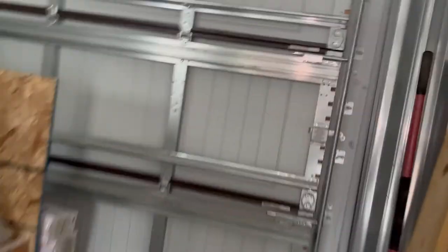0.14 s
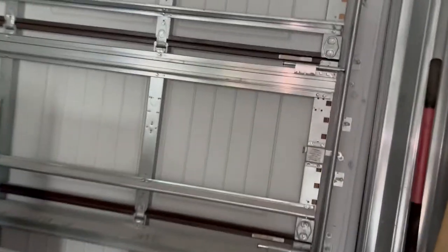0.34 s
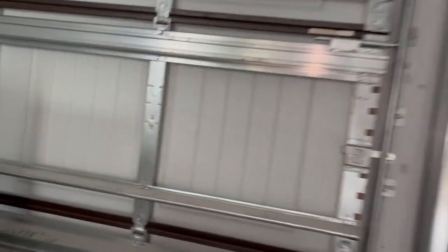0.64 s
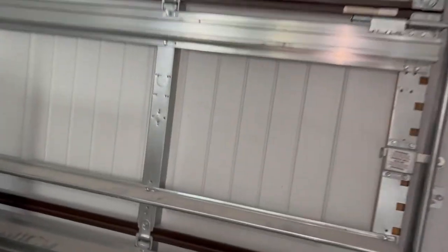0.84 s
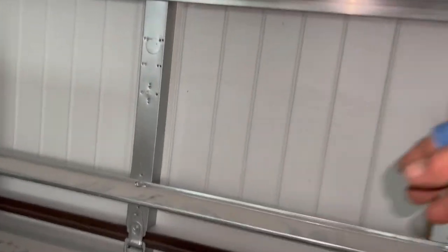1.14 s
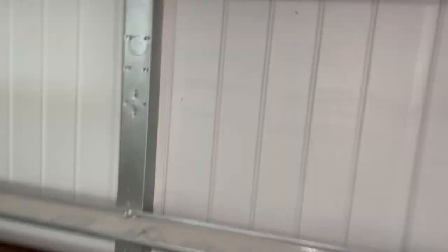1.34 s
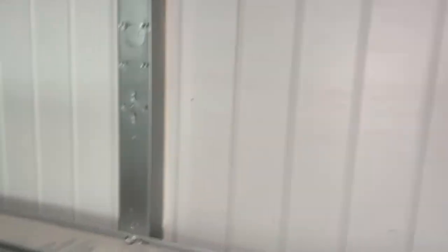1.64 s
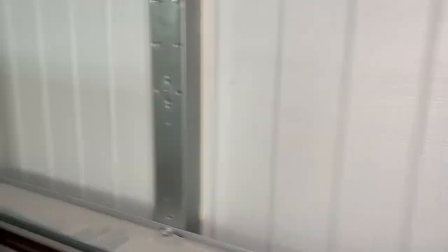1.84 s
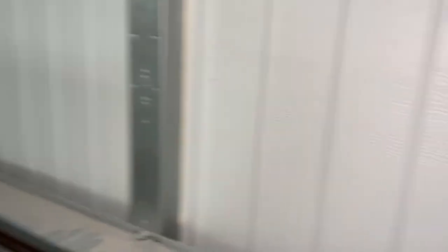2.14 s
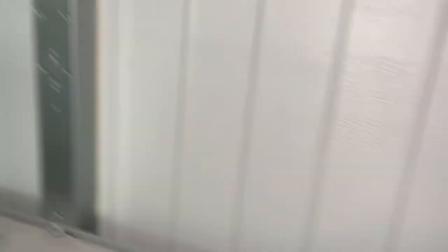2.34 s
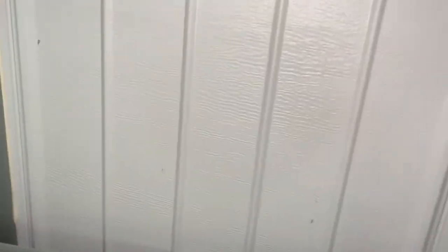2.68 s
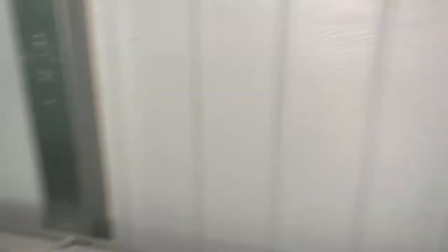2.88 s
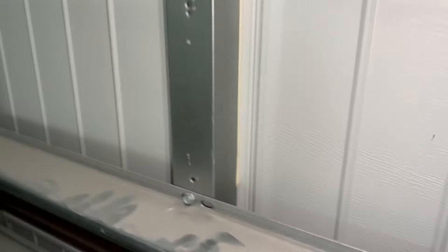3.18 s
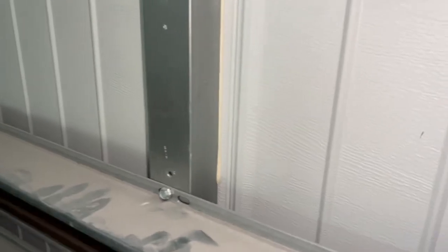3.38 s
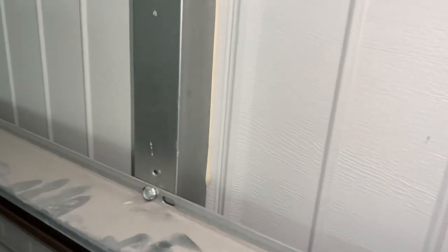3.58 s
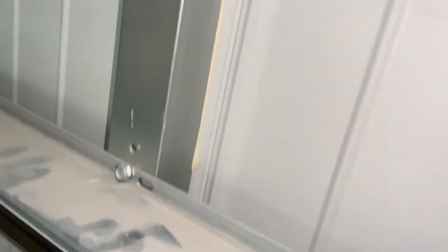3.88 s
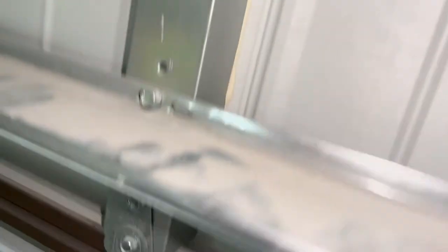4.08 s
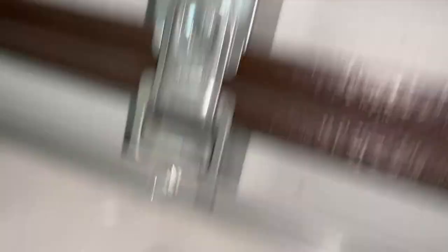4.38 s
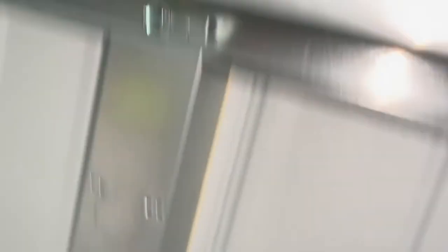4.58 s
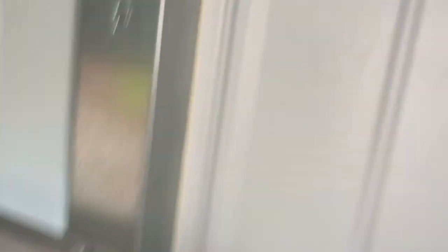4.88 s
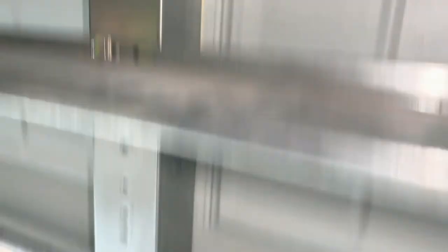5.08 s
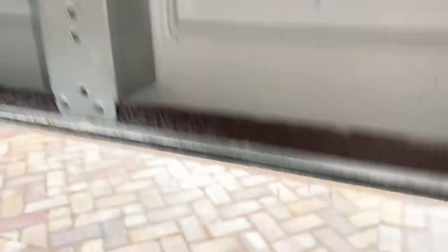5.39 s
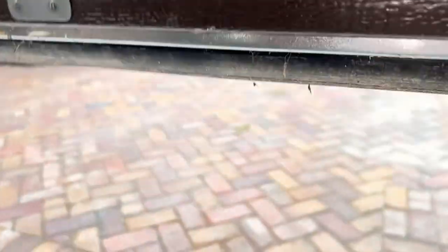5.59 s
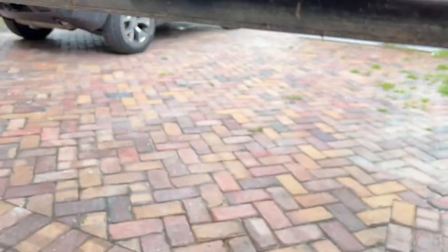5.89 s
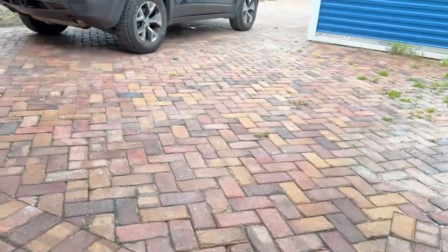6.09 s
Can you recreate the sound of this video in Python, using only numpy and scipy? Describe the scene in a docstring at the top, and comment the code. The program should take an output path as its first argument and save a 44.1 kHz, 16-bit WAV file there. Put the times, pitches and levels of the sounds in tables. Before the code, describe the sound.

Close up in a garage: small bright key jingles, faint scuffing soles and light touches on a handle. A slide bolt catches with hollow knocks, then shoots back in a loud squeaky clack that leaves the panels quivering. After a short lull the sectional steel door rolls up, booming and rattling with clanking hinges, swells, nearly stops, and rolls on.

```python
"""A garage: someone with jingling keys steps up to a sectional steel door and shoots back its slide bolt.
The panels shudder, then the door is heaved up: its speed drives boom, rumble and rattle, made of random
impacts shaped by filters and resonances. Hinges clank, rollers grind and squeak, panels knock as damped tones.
It almost stops, then rolls on. A phone with two microphone ports is held close to the panels."""
import sys
import numpy as np
from scipy import signal
from scipy.fft import rfft, irfft, next_fast_len
from scipy.io import wavfile
from scipy.ndimage import uniform_filter1d, map_coordinates

SR = 44100
rng = np.random.default_rng(int(sys.argv[2]) if len(sys.argv) > 2 else 0)


def dump_mix(stems):
    """Bounce the given channels to the path in sys.argv[1] as a 16-bit WAV at rate SR."""
    frames = np.atleast_2d(stems).T  # one column per channel
    limited = np.clip(frames, -1, 1)  # hard clip at full scale
    pcm = np.round(limited * 32767).astype(np.int16)
    wavfile.write(sys.argv[1], SR, pcm)


N = 274743


def amp(db):
    """Amplitude factor of a level in dB."""
    return 10 ** (np.asarray(db) / 20)


def unit(x):
    """x scaled to rms 1."""
    return x / np.sqrt(np.mean(x ** 2) + 1e-20)


def along(points, hz):
    """Frequency-value points read on a log frequency axis."""
    f, v = np.transpose(points)
    return np.interp(np.log(hz + 1), np.log(f + 1), v)


def wobble(rate_hz):
    """Smooth random curve with rate_hz knots a second."""
    knots = rng.standard_normal(int(N * rate_hz / SR) + 4)
    return map_coordinates(knots, [np.arange(N) * rate_hz / SR])


def add(track, start_s, x):
    """Mix x into the track from start_s."""
    start = max(round(start_s * SR), 0)
    track[start:start + len(x)] += x[:N - start]


def coloured(x, spectrum):
    """Causal minimum-phase filter with the given spectrum; white noise keeps its power."""
    size = 16384
    gain = unit(amp(along(spectrum, np.fft.rfftfreq(size, 1 / SR))))
    cepstrum = irfft(np.log(gain + 1e-6))
    cepstrum[1:size // 2] *= 2
    cepstrum[size // 2 + 1:] = 0
    response = irfft(np.exp(rfft(cepstrum)))[None, :size // 2]
    return signal.fftconvolve(x, response, axes=1)[:, :N]


def contacts(size, rate_hz, spread_db):
    """Random tiny impacts of uneven strength, rms 1."""
    chance, strength = rng.random(size), rng.standard_normal(size)
    sign = rng.choice([-1, 1], size)
    hit = chance < rate_hz / SR
    hit[0] = True
    return unit(hit * sign * amp(spread_db * strength))


def burst(length_s, rate_hz, fade_db):
    """Short run of impacts that weakens by fade_db over its length, or grows if that is negative."""
    size = max(int(length_s * SR), 16)
    return unit(contacts(size, rate_hz, spread_db=2.5) * amp(-fade_db * np.arange(size) / size))


def swell(start_s, hold_s, fade_db_per_s):
    """Envelope that rises over 45 ms from start_s, holds, then dies away."""
    age_s = np.arange(N) / SR - start_s
    return np.clip(age_s / 0.045, 0, 1) * amp(-fade_db_per_s * np.maximum(age_s - hold_s, 0))


def ringing(modes, scatter_db):
    """Damped modes at new strengths and phases, energy 1."""
    t = np.arange(SR // 4) / SR
    ring = np.zeros(len(t))
    for hz, db, t60_s in modes:
        decay = amp(db + scatter_db * rng.normal() - 60 * t / t60_s)
        ring += decay * np.sin(2 * np.pi * (hz * t + rng.random()))
    return ring / np.linalg.norm(ring)


def resonance(x, hz, width_hz):
    """What passes through one resonance; gain 1 at its centre."""
    return signal.lfilter(*signal.iirpeak(hz, hz / width_hz, fs=SR), x)


def body(x, modes):
    """x with the resonances of a body standing out of it."""
    return x + sum((amp(db) - 1) * resonance(x, hz, width_hz) for hz, width_hz, db in modes)


def even(x, span_s):
    """x with its chance swells levelled out; rms 1."""
    span = int(span_s * SR)
    power = uniform_filter1d(uniform_filter1d(x ** 2, span), span)
    return unit(x / np.sqrt(np.abs(power) + 0.17 * np.mean(x ** 2)))


# Decay of the room tail. Each row: frequency in Hz, t60 in seconds.
ROOM_DECAY = [(80, 0.64), (500, 0.32), (2000, 0.57), (5000, 0.47), (12000, 0.34)]


def garage(x, direct_db, wet_db):
    """Two paths to the phone: same direct sound, unrelated near reflections off the door and room tails."""
    hz, t, z = signal.stft(rng.standard_normal((2, SR * 3 // 4)), SR, nperseg=256)
    decay = amp(-60 * t / along(ROOM_DECAY, hz)[:, None])
    tail = signal.istft(z * decay, SR, nperseg=256)[1]
    age_s = np.arange(tail.shape[1]) / SR
    near = rng.standard_normal(tail.shape) * amp(-60 * age_s / 0.15)
    direct = unit(1. * (age_s == 0))
    paths = amp(direct_db) * direct + unit(near) + amp(wet_db) * unit(tail)
    paths /= np.linalg.norm(paths, axis=1, keepdims=True)
    return signal.fftconvolve(x[None], paths, axes=1)[:, :N]


# Ringing of track and hinges. Each row: frequency in Hz, relative level in dB, t60 in seconds.
STEEL_MODES = [(1378, 4, 0.14), (1955, 6, 0.22), (2170, -9, 0.11), (2360, -9, 0.13), (2640, -2, 0.08),
               (3190, -7, 0.11), (3900, 2, 0.044), (5200, 1, 0.047), (5730, 1, 0.013), (6500, -1, 0.04),
               (6760, 4.5, 0.029), (11100, 23.5, 0.0094)]


def steel(force, ring_db, detune=0.0):
    """Impacts crack and leave steel ringing; detune scatters the pitches as if another spot were struck."""
    modes = [(hz * np.exp(detune * rng.normal()), db, t60_s) for hz, db, t60_s in STEEL_MODES]
    ring = signal.fftconvolve(force, ringing(modes, scatter_db=5))[:len(force)]
    return (force + amp(ring_db) * ring) / np.hypot(1, amp(ring_db))


def clinks(rate_hz, centre_hz, spread, t60_s):
    """Loose rollers and brackets knock as damped sines, each at its own pitch; rms 1."""
    count = int(rate_hz * N / SR)
    when, t = rng.random(count), np.arange(SR // 10) / SR
    pitch, strength = rng.standard_normal((count, 2)).T[:, :, None]
    hz = centre_hz * np.exp(spread * 2 * np.tanh(pitch / 2))
    decay = amp(4.7 * np.clip(strength, -2, 2) - 60 * t / t60_s)
    grains = decay * np.sin(2 * np.pi * hz * t)
    where = (when * N).astype(int)[:, None] + np.arange(len(t))
    return unit(np.bincount(where.ravel(), grains.ravel(), N)[:N])


# Background colour. Each row: frequency in Hz, relative level in dB.
AIR_COLOUR = [(10, -23), (25, -9), (45, -1.5), (72, 7), (95, 1.5), (125, -1), (250, -12.5), (600, -18),
              (1500, -24.5), (4000, -29), (9000, -34), (15000, -28.5)]


def air():
    """Low background of the garage: coloured noise whose level wavers slightly."""
    return amp(-54.0 + wobble(7.55)) * coloured(rng.standard_normal((2, N)), AIR_COLOUR)


# Key touches. Each row: start in seconds, relative level in dB, favoured frequency in Hz.
KEY_TOUCHES = [(0.2825, -46, 15800), (.404, -36, 11100), (.557, -42, 15500), (.62, -37, 13300),
               (.733, -28.5, 14950), (.764, -34.5, 15700), (0.8539, -37, 11060), (1.03, -42.5, 14700),
               (1.1384, -44, 15100), (1.293, -44.5, 6530), (1.66, -45, 13300), (1.7736, -29, 14830),
               (5.674, -47.5, 15700)]
SWAY_FROM_S, SWAY_TO_S, SWAY_DB, SWAY_HZ = 0.12, 1.3, -54, 13300


def touches(count):
    """The clear touches of the keys and count faint ones at random while walking."""
    faint = [(rng.uniform(SWAY_FROM_S, SWAY_TO_S), SWAY_DB, SWAY_HZ) for k in range(count)]
    return list(KEY_TOUCHES) + faint


# Ringing of the keys. Each row: frequency in Hz, relative level in dB, t60 in seconds.
KEY_MODES = [(6530, -15.5, 0.13), (6560, -6, 0.098), (7590, -16, 0.14), (9850, -0.5, 0.16),
             (10500, -16, .25), (11370, -11, 0.29), (11290, 2, 0.058), (13300, -6.5, 0.37),
             (14360, 4, 0.23), (14780, 8, 0.096), (15700, -3, 0.29)]
# Colour of the contact ticks. Each row: frequency in Hz, relative level in dB.
TICK_COLOUR = [(1000, -8), (5000, 0), (6600, -13), (8000, -7), (11300, 6), (12300, 11), (13300, 13),
               (15300, 9.5)]
CHATTER_S, CHATTER_RATE_HZ, CHATTER_FADE_DB = 0.057, 270, 37  # keys swing back and touch again
KEY_SPREAD = 0.0058  # relative pitch scatter between similar keys


def keys():
    """Keys chatter against each other; every touch rings three of them, each a little differently."""
    rings, ticks = np.zeros(N), np.zeros(N)
    for start_s, db, bright_hz in touches(count=7):
        for key in range(3):
            modes = []
            for hz, level_db, t60_s in KEY_MODES:
                lift_db = 6 * np.exp(-((hz - bright_hz) / 500) ** 2)
                modes.append((hz * (1 + KEY_SPREAD * rng.normal()), level_db + lift_db, t60_s))
            touch = burst(CHATTER_S, CHATTER_RATE_HZ, CHATTER_FADE_DB)
            touch /= np.linalg.norm(touch)
            add(rings, start_s, amp(db + 23.0) * signal.fftconvolve(touch, ringing(modes, scatter_db=1.0)))
        add(ticks, start_s, amp(db - 16.5) * burst(0.03, rate_hz=3800, fade_db=20))
    contact = coloured(garage(ticks, direct_db=-20, wet_db=-21.5), TICK_COLOUR)
    return garage(rings, direct_db=30.5, wet_db=8) + contact


# Low thumps and hums of feet, bolt and door. Each row: start in seconds, level in dB, pitch in Hz,
# t60 in seconds.
LOW_THUMPS = [(0, -45.5, 116, 0.75), (0.107, -31, 58.13, 0.13), (.142, -24.5, 63.4, 0.078),
              (.164, -23.5, 54.5, 0.25), (.34, -40.5, 55, 0.45), (1.478, -37.5, 60, 0.49),
              (1.758, -40.5, 72, 3), (2.985, -26, 68.5, .7), (3.165, -21.5, 71.4, 0.43)]
# Soles. Each row: start in seconds, length in seconds, level in dB.
SOLE_SCUFFS = [(0.407, 0.085, -59), (0.513, 0.049, -50), (1.04, 0.17, -60), (1.204, 0.018, -48),
               (1.774, 0.037, -53.5), (1.859, 0.018, -44)]


def thumps_and_scuffs():
    """Low thumps and hums are damped sines; soles scuff the concrete as coloured grit."""
    thumps, scuffs, t = np.zeros(N), np.zeros(N), np.arange(SR) / SR
    attack = 1 - np.exp(-t / 0.0013)
    for start_s, db, hz, t60_s in LOW_THUMPS:
        add(thumps, start_s, amp(db - 60 * t / t60_s) * np.sin(2 * np.pi * hz * t) * attack)
    for start_s, length_s, db in SOLE_SCUFFS:
        add(scuffs, start_s, amp(db) * burst(length_s, rate_hz=6000, fade_db=-3.0))
    sole = [(100, -6.0), (350, 6.5), (1000, -1.5), (2500, -10.5), (7000, -15), (15000, -22)]
    return thumps + coloured(garage(scuffs, direct_db=-11.0, wet_db=-1.5), sole)


# Hand on the handle. Each row: start in seconds, relative knock in dB, rub in dB, rub length in seconds.
HAND_TOUCHES = [(0.429, -55, -60, 0.099), (0.521, -52, -59, .06), (1.015, -45, -59, .1),
                (1.117, -46, -52.5, .08)]
# Handle colour. Each row: frequency in Hz, relative level in dB.
HANDLE_COLOUR = [(120, -16), (210, -8), (300, 11), (430, 8.5), (550, -2), (700, -1.5), (1100, 0),
                 (1350, -15), (2700, -18), (9000, -40)]


def handle():
    """A hand finding the bolt's handle knocks lightly against it and drags over the panel."""
    force = np.zeros(N)
    for start_s, knock_db, rub_db, length_s in HAND_TOUCHES:
        add(force, start_s, amp(knock_db + 1.5) * burst(0.011, rate_hz=2500, fade_db=17))
        add(force, start_s, amp(rub_db) * burst(length_s, rate_hz=1500, fade_db=8))
    return coloured(garage(force, direct_db=4.5, wet_db=-0.5), HANDLE_COLOUR)


# Bolt slides. Each row: start in seconds, length in seconds, guide scrape in dB, panel in dB, slot rub in dB.
BOLT_STROKES = [(1.448, 0.015, -41, -34.5, -50), (1.462, 0.087, -36.5, -36.5, -42),
                (1.973, 0.019, -39, -29, -41), (1.991, 0.19, -52.5, -35.5, -56),
                (2.045, 0.047, -34.5, -56, -61), (2.219, .03, -23, -25, -27), (2.251, 0.02, -13, -43, -21),
                (2.274, 0.00347, -11.5, -11.5, -23)]
# Colours of guide scrape, flange or slot rub, struck panel. Each row: frequency in Hz, relative level in dB.
SCRAPE_COLOUR = [(80, -12), (250, -21), (500, 10.5), (900, 5.5), (1600, -2), (2500, -2), (4000, -5),
                 (5600, -4.5), (7500, -3.5), (9800, -11.5), (11100, -13.5), (13000, -14), (15500, -26)]
FLANGE_COLOUR = [(500, -31.5), (950, 11.5), (1330, 11.5), (1700, 0.5), (2200, 0.5), (2450, -1), (2620, 0),
                 (3000, -10), (4200, -10), (9000, -44)]
PANEL_COLOUR = [(15, -56), (50, -30), (150, -5.5), (300, 1.5), (520, 5), (750, 3.5), (1200, -6.5),
                (1600, -13), (2200, -18.5), (4000, -21), (12000, -65)]
FREED_S = 2.289  # bolt is out


def bolt():
    """The bolt grinds through its guide and the track's slot, shakes its panel and chatters against its stop."""
    scrape, shake, rub = np.zeros((3, N))
    for start_s, length_s, scrape_db, panel_db, slot_db in BOLT_STROKES:
        add(scrape, start_s, amp(scrape_db) * burst(length_s, rate_hz=2000, fade_db=3.0))
        add(shake, start_s, amp(panel_db) * burst(length_s, rate_hz=1500, fade_db=2))
        add(rub, start_s, amp(slot_db) * burst(length_s, rate_hz=500, fade_db=-5.0))
    add(scrape, FREED_S, amp(-34.5) * burst(0.075, rate_hz=3100, fade_db=17))
    add(shake, FREED_S, amp(-20.0) * burst(0.1, rate_hz=1900, fade_db=19))
    grind = coloured(garage(steel(scrape, ring_db=-9.5), direct_db=8, wet_db=1.5), SCRAPE_COLOUR)
    slot = coloured(garage(rub, direct_db=12, wet_db=-9), FLANGE_COLOUR)
    return grind + slot + coloured(garage(shake, direct_db=-2.5, wet_db=-1.0), PANEL_COLOUR)


# Modes of a struck panel. Each row: multiple of its pitch, relative level in dB, t60 in seconds.
KNOCK_MODES = [(.68, -12.5, 0.092), (1, 0, .075), (1.21, -10, 0.041), (1.63, -20, 0.044),
               (2.4, -23.5, 0.032)]
KNOCK_ATTACK_S = 0.0014


def panel_knock(pitch_hz):
    """One blow rings a patch of sheet steel around the given pitch."""
    t = np.arange(SR // 5) / SR
    ring = np.zeros(len(t))
    for ratio, db, t60_s in KNOCK_MODES:
        decay = amp(db + 2 * rng.normal() - 60 * t / t60_s)
        hz = pitch_hz * ratio * (1 + 0.023 * rng.normal())
        ring += decay * np.sin(2 * np.pi * hz * t)
    return ring * (1 - np.exp(-t / KNOCK_ATTACK_S))


# Bolt knocking in its guide. Each row: start in seconds, panel tone in dB, pitch in Hz, relative clatter in dB.
BOLT_CATCHES = [(1.448, -27, 551, -49), (1.465, -25.5, 726, -31.5), (1.479, -26.5, 504, -47),
                (1.492, -24.5, 461, -35), (1.510, -21.5, 817, -33), (1.521, -27, 422.5, -36),
                (1.530, -24.5, 620, -32), (1.539, -29.5, 401, -37), (1.98, -19.5, 788, -46),
                (2.011, -22.5, 713, -42), (2.024, -23, 880, -47.5), (2.049, -37, 617, -46),
                (2.063, -38, 760, -46), (2.078, -32, 504, -47), (2.091, -36, 700, -44),
                (2.103, -26, 610, -40), (2.224, -16, 590, -27), (2.252, -19, 1024, -24),
                (2.264, -7.5, 755, -23.5), (2.292, -6.5, 583, -33), (2.311, -11, 536, -34),
                (2.331, -16, 450, -30)]
# Clatter colour. Each row: frequency in Hz, relative level in dB.
CLATTER_COLOUR = [(400, -37), (1100, -5), (1600, 12.5), (2200, 9), (3000, 3), (4200, 1.5), (7000, -16),
                  (15000, -33)]
# Ringing of bolt and guide. Each row: frequency in Hz, relative level in dB, t60 in seconds.
LATCH_MODES = [(1314, -1, .07), (1425, 2.5, .06), (1783, -1.5, .075), (2035, -1.5, .065), (2230, 4, .055),
               (2628, -2.5, .05), (2860, -0.5, .08), (3133, -5.5, .09), (3610, -5.5, .07),
               (3940, -8.5, .05)]


def catches():
    """The bolt moves in jerks: each catch knocks the panel and sets the bolt ringing in its guide."""
    knock, clatter, ring = np.zeros((3, N))
    for start_s, knock_db, hz, clatter_db in BOLT_CATCHES:
        add(knock, start_s, amp(knock_db) * panel_knock(hz))
        hits = amp(clatter_db) * burst(0.012, rate_hz=400, fade_db=5)
        add(clatter, start_s, hits)
        add(ring, start_s, signal.fftconvolve(hits, ringing(LATCH_MODES, scatter_db=3)))
    metal = amp(-3) * coloured(garage(clatter, direct_db=1, wet_db=-6.0), CLATTER_COLOUR)
    metal += amp(-0.5) * garage(ring, direct_db=11, wet_db=-5.5)
    return metal + garage(knock, direct_db=8, wet_db=-3.5)


# Sheet colour. Each row: frequency in Hz, relative level in dB.
SHEET_COLOUR = [(15, -28), (30, -29), (60, -7), (95, -12), (170, -3.5), (300, -5.5), (520, -2.5),
                (780, -7.5), (950, -15), (1250, -22), (2200, -26.5), (4000, -38), (7000, -44), (14000, -63)]
# Hollow resonances of the closed door's panels. Each row: frequency in Hz, width in Hz, lift in dB.
HOLLOW_MODES = [(432, 28, 7), (478, 30, 3), (530, 45, 4.5), (595, 30, 3), (665, 30, 2.5), (745, 28, 4.5),
                (835, 45, 6), (1150, 22, 8)]
SHUDDER_DB, SHUDDER_HOLD_S, SHUDDER_FADE_DB_PER_S = -26, 0.39, 27


def shudder():
    """The freed sheet panels keep quivering with a hollow ring, then settle."""
    quiver = garage(contacts(N, rate_hz=900, spread_db=0.5), direct_db=4.0, wet_db=1.5)
    ring = even(body(coloured(quiver, SHEET_COLOUR), HOLLOW_MODES), span_s=0.04)
    return amp(SHUDDER_DB) * swell(FREED_S, SHUDDER_HOLD_S, SHUDDER_FADE_DB_PER_S) * ring


BRUSH_S, BRUSH_LENGTH_S, BRUSH_DB = 5.31, 0.18, -48.5


def brush():
    """The rubber seal brushes the frame with a short bright hiss as the door slows."""
    rub = np.zeros(N)
    add(rub, BRUSH_S, amp(BRUSH_DB) * burst(BRUSH_LENGTH_S, rate_hz=10000, fade_db=16))
    rubber = [(1500, -18), (4500, 5.5), (5800, -8), (8000, 4), (13000, -4), (15500, -1.0)]
    return coloured(garage(rub, direct_db=-1, wet_db=15), rubber)


# Dry steel. Each row: start in seconds, hold in seconds, pitch in Hz, nominal width in Hz, level in dB,
# fade in dB per second.
STEEL_SQUEAKS = [(2.239, 0.02, 2585, 110, -17.5, 600), (2.255, 0.016, 5590, 450, -19.5, 900),
                 (2.256, 0.014, 10800, 603, -24.5, 900), (3.081, 0.0085, 2785, 200, -32.5, 380),
                 (3.136, .02, 2775, 110, -46.5, 220), (3.3, 0.018, 1250, 423, -25.5, 450),
                 (3.288, .08, 2570, 600, -40.5, 300), (4.466, 0.021, 2850, 500, -31, 400),
                 (4.544, 0.023, 2160, 380, -28.5, 400), (4.584, 0.018, 2350, 300, -35, 401),
                 (4.64, 0.12, 3220, 550, -36, 200), (4.805, 0.04, 2870, 600, -30.5, 400),
                 (4.838, 0.0096, 2650, 140, -30.5, 175), (4.902, 0.39, 2550, 200, -57.5, 60),
                 (5.297, 0.05, 7100, 800, -44, 198), (5.44, 0.037, 3040, 100, -54, 250),
                 (5.873, 0.01, 2260, 1200, -32, 500), (6.21, .02, 2340, 700, -38, 300)]
SQUEAK_ATTACK_S, SLIP_RATE_HZ, RESONANCE_PASSES = 0.0052, 3800, 3


def squeaks():
    """Dry steel sticks and slips unevenly into one resonance: a narrow one squeals, a wide one scrapes."""
    out, t = np.zeros(N), np.arange(SR * 3 // 4) / SR
    attack = np.clip(t / SQUEAK_ATTACK_S, 0, 1)
    for start_s, hold_s, hz, width_hz, db, fade_db_per_s in STEEL_SQUEAKS:
        ring = contacts(len(t), SLIP_RATE_HZ, spread_db=0.5)
        for k in range(RESONANCE_PASSES):
            ring = resonance(ring, hz, 1.5 * width_hz)  # repeated passes narrow it
        decay = amp(db - fade_db_per_s * np.maximum(t - hold_s, 0))
        add(out, start_s, attack * decay * even(ring, span_s=0.008))
    return garage(out, direct_db=8, wet_db=-5)


# Flanges in the bend. Each row: start in seconds, hold in seconds, level in dB, fade in dB per second.
FLANGE_GRINDS = [(3.266, 0.18, -33, 130), (4.44, 0.37, -27.5, 62), (5.847, 0.0106, -30.5, 110),
                 (6.125, 0.16, -30, 58)]


def flanges():
    """In the bend of the track the roller flanges grind on the rail: impacts coloured strongest near 1 kHz."""
    pressure = sum(amp(db) * swell(start_s, hold_s, fade) for start_s, hold_s, db, fade in FLANGE_GRINDS)
    grit = pressure * contacts(N, rate_hz=1400, spread_db=4.0)
    return coloured(garage(grit, direct_db=3.5, wet_db=-2), FLANGE_COLOUR)


# Hinges in the track. Each row: start in seconds, clank in dB, panel in dB, chatter length in seconds.
HINGE_CLANKS = [(2.983, -35, -31.5, 0.022), (3.164, -37.5, -40, 0.0066), (3.306, -35.5, -19.5, 0.012),
                (3.352, -30.5, -22, 0.053), (3.582, -36, -47, 0.032), (3.837, -40, -28.5, 0.024),
                (3.91, -38, -22, 0.0098), (4.119, -28.5, -17, 0.017), (4.444, -20, -13, 0.022),
                (4.542, -36.5, -17, 0.031), (4.637, -27.5, -21, 0.026), (4.737, -32.5, -20, 0.014),
                (4.77, -23, -39, 0.017), (4.801, -29, -23, 0.013), (5.234, -68, -28, .01),
                (5.719, -41, -36, 0.0083), (5.772, -38.5, -30, 0.011), (5.82, -39, -33, 0.0076),
                (5.875, -52, -23, 0.019), (6.05, -44, -27, 0.055), (6.103, -40, -25, 0.015),
                (6.199, -43, -24, 0.019)]
# Clank colour. Each row: frequency in Hz, relative level in dB.
CLANK_COLOUR = [(200, -31), (900, 8), (1400, 0), (2700, -0.5), (4000, -1), (5500, -3.5), (8000, -4),
                (9500, -13.5), (11000, -12), (15500, -16)]


def hinges():
    """Sections tip into the curve of the track with a chattering clank and a panel thud."""
    clank, thud = np.zeros(N), np.zeros(N)
    for start_s, clank_db, panel_db, length_s in HINGE_CLANKS:
        chatter = np.pad(burst(length_s, rate_hz=2700, fade_db=7.0), (0, SR // 4))  # room to ring out
        add(clank, start_s, amp(clank_db) * steel(chatter, ring_db=-7, detune=0.07))
        add(thud, start_s, amp(panel_db) * burst(length_s, rate_hz=1500, fade_db=7))
    metal = coloured(garage(clank, direct_db=0.5, wet_db=1.0), CLANK_COLOUR)
    return metal + coloured(garage(thud, direct_db=-11.0, wet_db=1.0), PANEL_COLOUR)


# Rollers dropping over bumps. Each row: start in seconds, level in dB, pitch in Hz.
ROLLER_BUMPS = [(2.972, -16.5, 497), (3.206, -22, 777), (3.303, -18, 1312), (3.316, -12.5, 1010),
                (3.388, -14.5, 754), (3.42, -16, 283), (3.563, -14.5, 567), (3.759, -13.5, 584),
                (3.846, -13, 503), (3.918, -12.5, 652), (3.995, -17, 222), (4.069, -9.5, 606),
                (4.152, -10, 663), (4.279, -18, 416), (4.305, -12.5, 670), (4.352, -10.5, 632),
                (4.452, -13, 1150), (4.492, -17.5, 1213), (4.532, -9, 638), (4.636, -10.5, 733),
                (4.803, -11, 630), (5.234, -25, 620), (5.729, -17.5, 311), (5.852, -20, 663),
                (5.982, -15.5, 585), (6.05, -13.5, 695), (6.106, -16, 703), (6.16, -15, 350),
                (6.203, -15.5, 450)]
# Rap colour. Each row: frequency in Hz, relative level in dB.
RAP_COLOUR = [(150, -12), (550, 8.5), (850, 6.5), (1300, -5), (2500, -16.5), (8000, -37)]
BUMP_DAMPING_DB_PER_S = 250  # on top of the panel's own decay


def bumps():
    """Rollers drop over bumps: short hollow panel knocks, each with a dry rap, ride on the rolling."""
    knock, rap, t = np.zeros(N), np.zeros(N), np.arange(SR // 5) / SR
    for start_s, db, hz in ROLLER_BUMPS:
        add(knock, start_s, amp(db - BUMP_DAMPING_DB_PER_S * t) * panel_knock(hz))
        add(rap, start_s, amp(db - 11) * burst(0.0055, rate_hz=2500, fade_db=4.5))
    raps = coloured(garage(rap, direct_db=8, wet_db=-2), RAP_COLOUR)
    return garage(knock, direct_db=11, wet_db=1.5) + raps


# Speed of the door. Each row: time in seconds, rolling level in dB.
DOOR_TRAVEL = [(2.95, -37), (3.1, -37), (3.321, -29.5), (3.48, -27.5), (3.7, -26), (3.84, -23),
               (4.01, -21.5), (4.23, -19.5), (4.53, -18.5), (4.77, -23), (4.91, -27), (5.05, -31.5),
               (5.35, -37.5), (5.53, -43), (5.79, -48), (5.91, -26.5), (6.07, -25), (6.23, -21)]
CRUISE_DB = -22


def speed(lag_s):
    """Speed of the door lag_s earlier, in dB over cruising."""
    time_s, db = np.transpose(DOOR_TRAVEL)
    return np.interp(np.arange(N) / SR - lag_s, time_s, db) - CRUISE_DB


# Tugs that set the whole door booming. Each row: start in seconds, level in dB.
DOOR_HEAVES = [(2.975, -27.5), (3.349, -21.5), (4.45, -14.5), (5.719, -24.5)]
HEAVE_FADE_DB_PER_S = 34
# Levels at cruising speed; growth in dB per dB of speed
BOOM_DB, BOOM_GROWTH, BOOM_LAG_S = -20, 1, 0.27  # heavy panels follow late
RATTLE_DB, RATTLE_GROWTH = -35.5, 0.83
# Bottom edge rises past the phone
OVERHEAD_S, PASSING_S, BOOM_LOSS_DB, RATTLE_LOSS_DB = 5.48, 0.3, 3.5, 12


def drive():
    """Gains of boom, rumble and rattle: all grow with speed; panels and hardware recede overhead."""
    moving = swell(DOOR_TRAVEL[0][0], 0, 0)
    away = np.clip((np.arange(N) / SR - OVERHEAD_S) / PASSING_S, 0, 1)
    rolling = moving * amp(BOOM_DB + BOOM_GROWTH * speed(BOOM_LAG_S) - BOOM_LOSS_DB * away)
    heaving = sum((amp(db) * swell(start_s, 0, HEAVE_FADE_DB_PER_S)) ** 2 for start_s, db in DOOR_HEAVES)
    boom = np.sqrt(rolling ** 2 + heaving)
    rumble = moving * amp(CRUISE_DB + speed(0))
    rattle = moving * amp(RATTLE_DB + RATTLE_GROWTH * speed(0) - RATTLE_LOSS_DB * away)
    return boom, rumble, rattle


# Colours of panels, rails, loose hardware. Each row: frequency in Hz, relative level in dB.
BOOM_COLOUR = [(18, -29), (32, -25), (50, -3.5), (60, -0.5), (66, 11), (76, -1.5), (95, -0.5), (125, -1),
               (200, -7.5), (280, -21.5), (450, -31), (900, -93)]
RUMBLE_COLOUR = [(100, -37.5), (200, 3.5), (320, 6.5), (450, -0.5), (580, 2.5), (780, 2), (950, -11.5),
                 (1350, -14), (1700, -16), (2600, -25.5), (5000, -43)]
RATTLE_COLOUR = [(300, -23), (1000, 6.5), (1600, -6.5), (2600, -1.5), (3600, -2.5), (5000, -8.5),
                 (7500, -10), (9900, -15.5), (11100, -17), (12500, -17), (15500, -19)]
# Resonances of the rolling door. Each row: frequency in Hz, width in Hz, lift in dB.
DOOR_MODES = [(112.4, 8.3, 2.5), (192.4, 16, 4.5), (220.7, 7.2, 3), (320, 14, 2.5), (521, 13.5, 7),
              (600, 40, 3.5), (783, 17, 3), (884, 9.2, 6.5), (1100, 33, 7.5), (1339, 21, 5)]


def rollers():
    """Many rollers run at once: panels boom, rails roar, and loose hardware rattles in clusters."""
    boom, rumble, rattle = drive()
    tread = np.array([contacts(N, rate_hz=2500, spread_db=1.5) for path in range(2)])
    panels = boom * even(body(coloured(tread, BOOM_COLOUR), DOOR_MODES), span_s=0.034)

    clusters = clinks(rate_hz=220, centre_hz=640, spread=0.42, t60_s=0.054) * amp(2.5 * wobble(18))
    knocks = garage(unit(clusters), direct_db=0.0, wet_db=-5.5)
    roar = even(body(coloured(tread, RUMBLE_COLOUR), DOOR_MODES), span_s=0.038)
    rails = rumble * unit(roar + amp(-7) * unit(body(knocks, DOOR_MODES)))

    chatter = unit(contacts(N, rate_hz=1200, spread_db=2.5) * amp(0.39 * wobble(25.09)))
    loose = steel(chatter, ring_db=-12)
    loose += amp(-6.0) * clinks(rate_hz=170, centre_hz=1200, spread=0.366, t60_s=0.03)
    hardware = rattle * unit(coloured(garage(loose, direct_db=2.0, wet_db=-1), RATTLE_COLOUR))
    return panels + rails + hardware


# Likeness of the two ports, swinging in the treble. Each row: frequency in Hz, likeness (clipped to -1..1).
PORT_LIKENESS = [(130, 0.97), (280, 0.94), (550, 0.69), (1000, 0.22), (1600, -0.026), (2400, 0.55),
                 (3300, 0.022), (5600, 0.33), (6500, 0.68), (8200, 0.5), (9150, -1.08), (9450, -1.02),
                 (10100, -0.94), (11100, 0.79), (11900, 1), (12400, 0.84), (13200, -0.24), (14100, -1.4),
                 (14550, -0.57), (15150, -0.7), (15700, -0.26)]


def scene():
    """All sources summed; both paths reach the two ports as their sum and difference."""
    paths = air() + keys() + thumps_and_scuffs() + handle() + bolt() + catches() + shudder() + brush()
    paths = paths + squeaks() + flanges() + hinges() + bumps() + rollers()
    size = next_fast_len(N + 8192)
    hz = np.fft.rfftfreq(size, 1 / SR)
    turn = np.arccos(np.clip(along(PORT_LIKENESS, hz), -1, 1)) / 2
    # a delay between ports puts the difference in quadrature
    mid, side = rfft(paths, size) * [np.cos(turn), -1j * np.sin(turn)]
    left_over_right_db = along([(60, -1.1), (250, 0.55), (2000, 2.0), (4000, 1.0), (10000, 0.14)], hz)
    lean = amp(left_over_right_db / 2)
    return irfft([(mid + side) * lean, (mid - side) / lean], size)[:, :N]


TOP_HZ = 15850


def record(dry):
    """The phone rounds off the highest peaks and keeps nothing above its band limit."""
    held = dry / (1 + dry ** 8) ** (1 / 8)
    size = next_fast_len(N + 8192)
    passed = np.fft.rfftfreq(size, 1 / SR) < TOP_HZ
    return irfft(rfft(held, size) * passed, size)[:, :N]


dry = scene()
out = record(dry)
dump_mix(out)
```